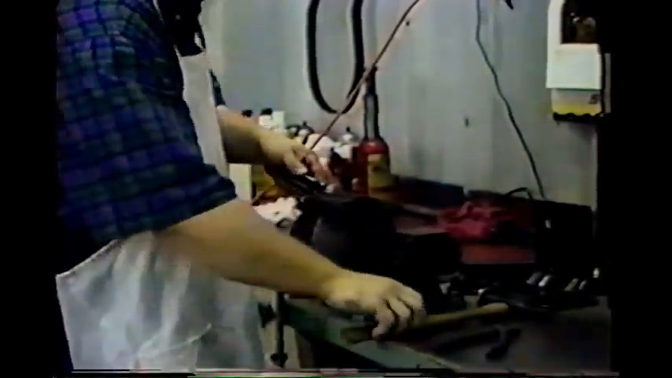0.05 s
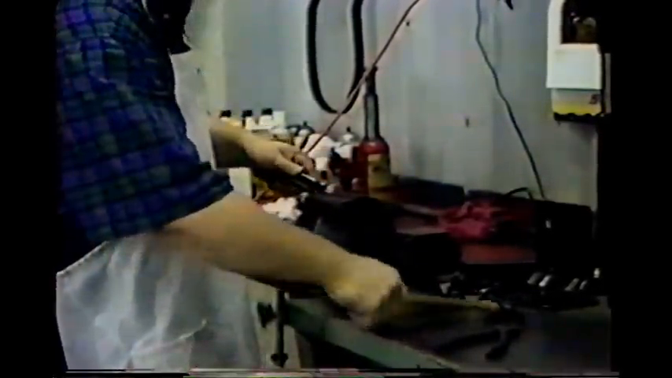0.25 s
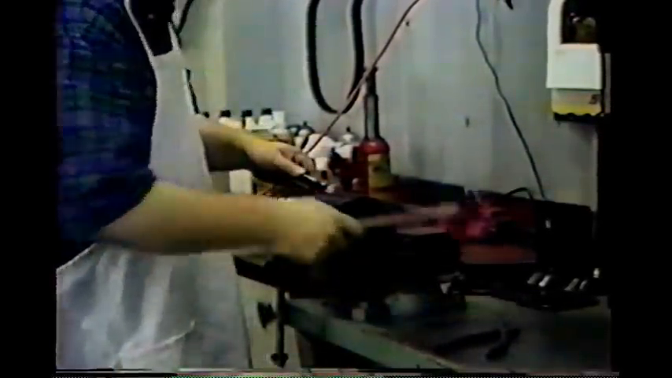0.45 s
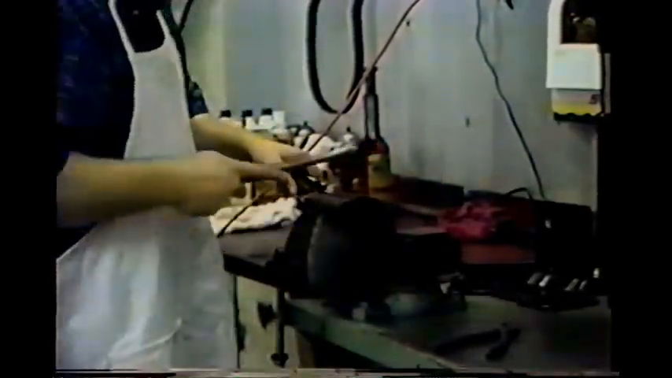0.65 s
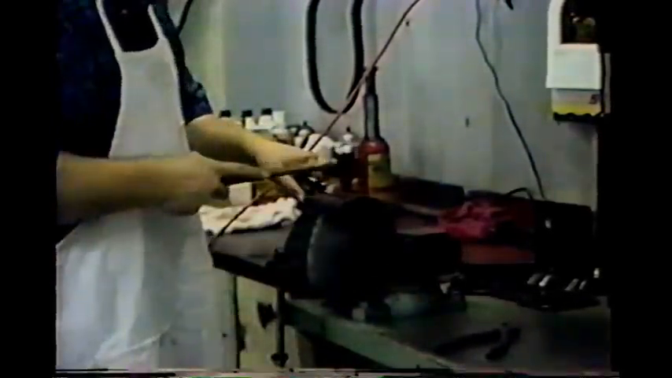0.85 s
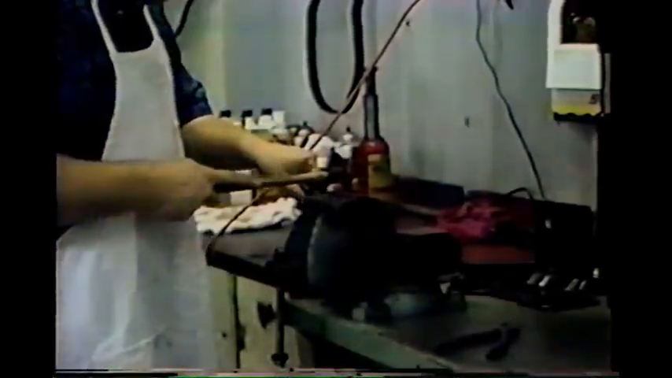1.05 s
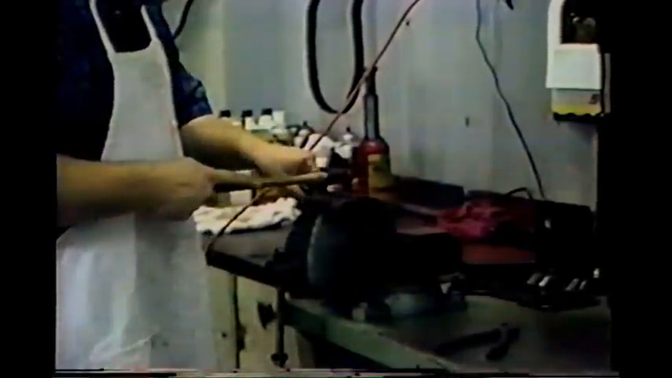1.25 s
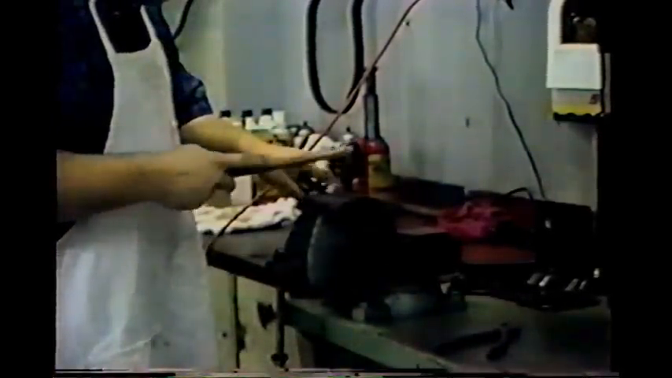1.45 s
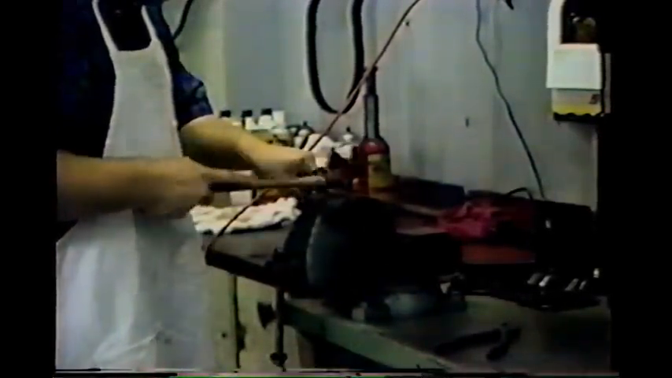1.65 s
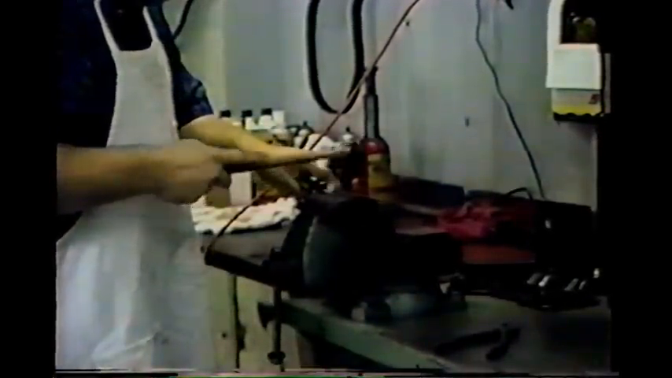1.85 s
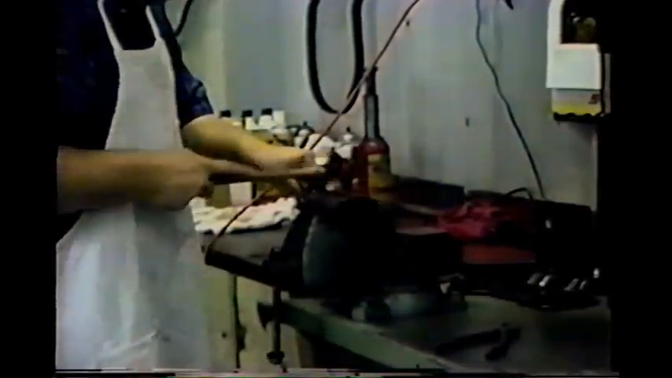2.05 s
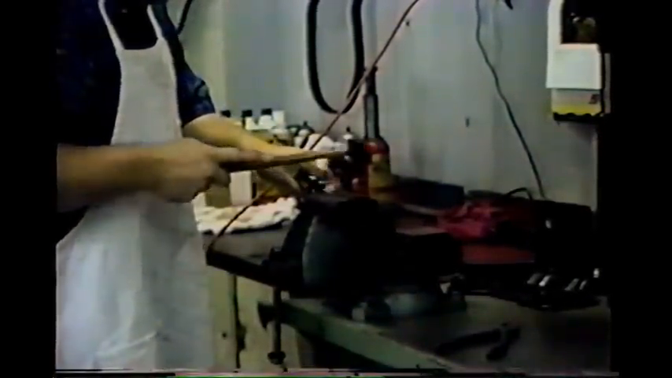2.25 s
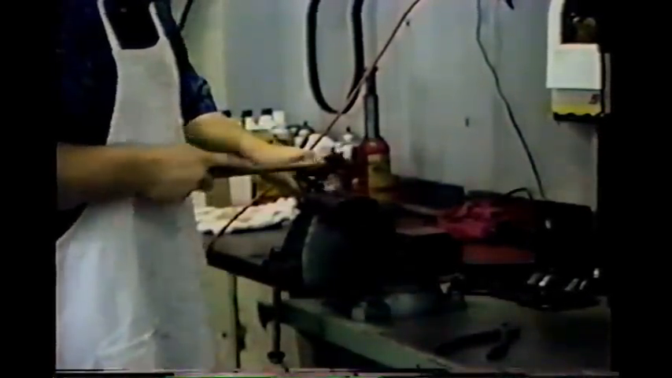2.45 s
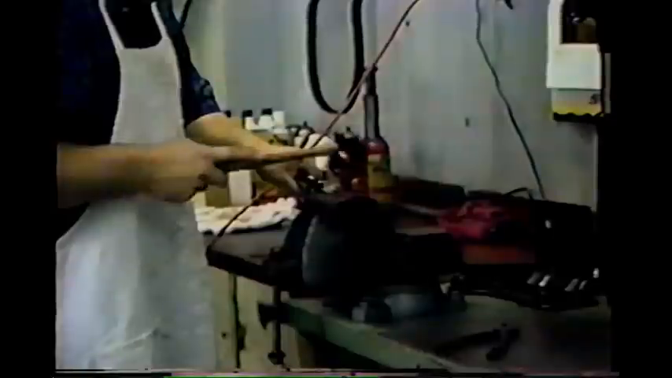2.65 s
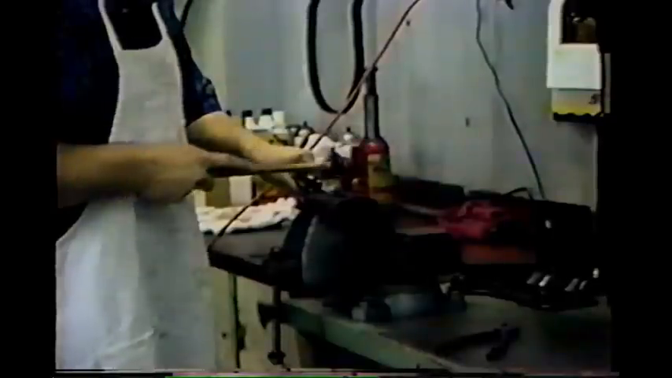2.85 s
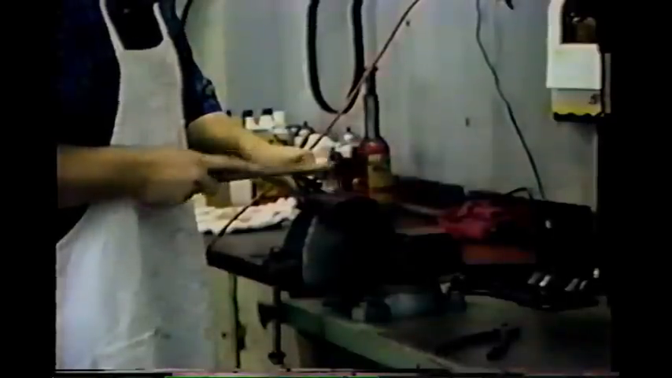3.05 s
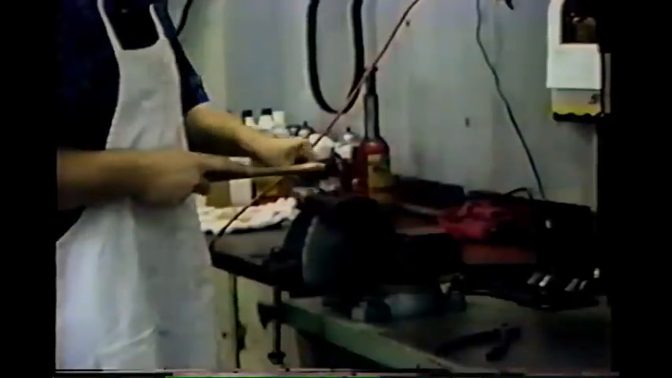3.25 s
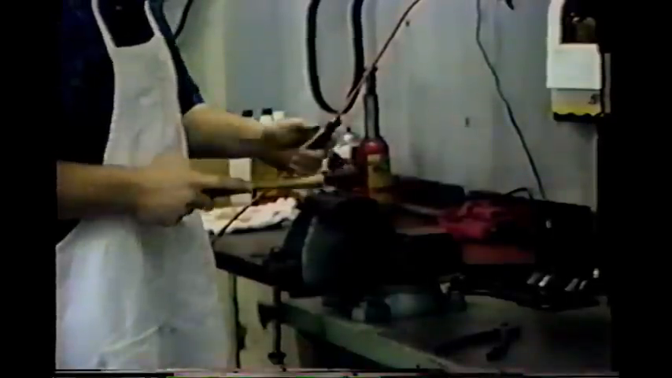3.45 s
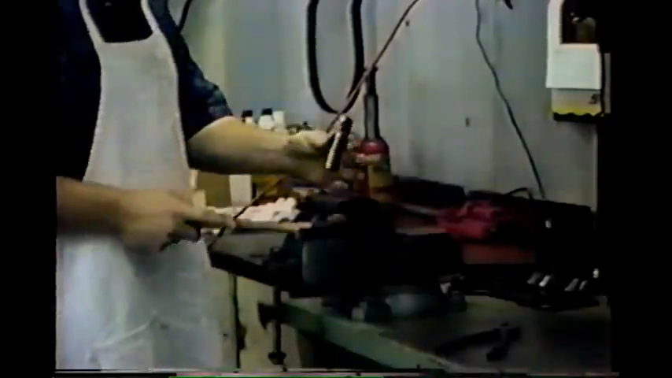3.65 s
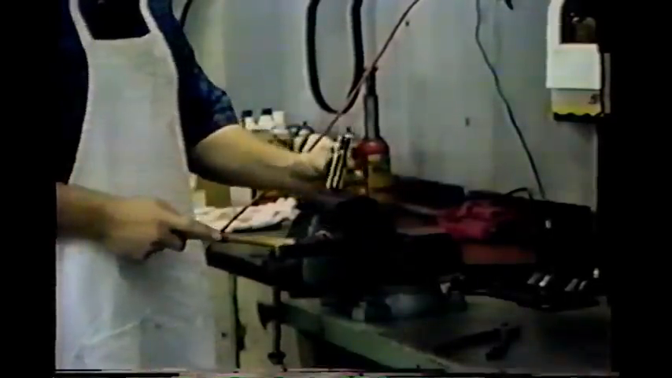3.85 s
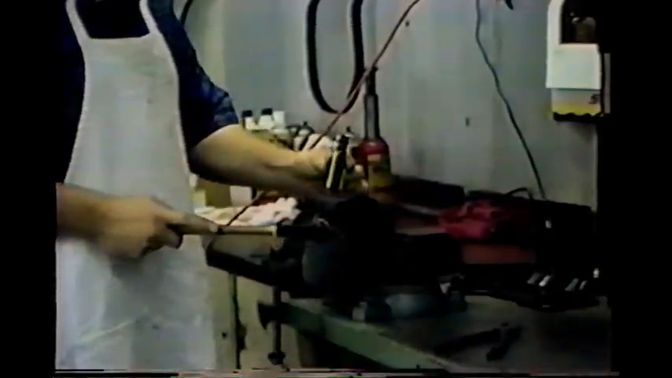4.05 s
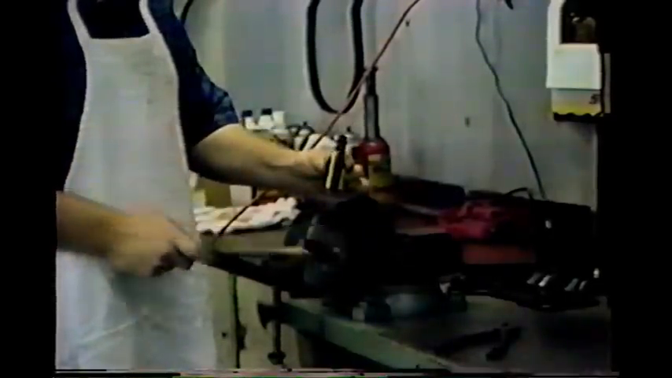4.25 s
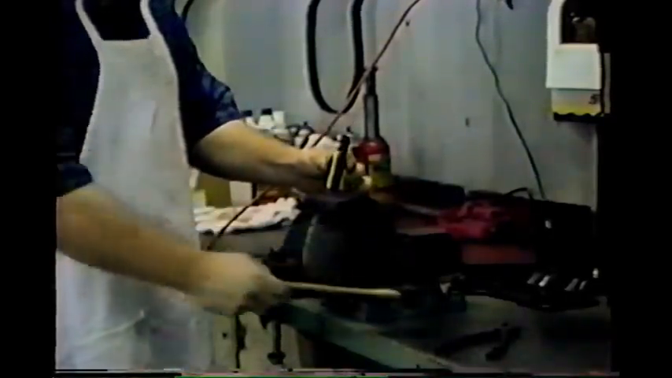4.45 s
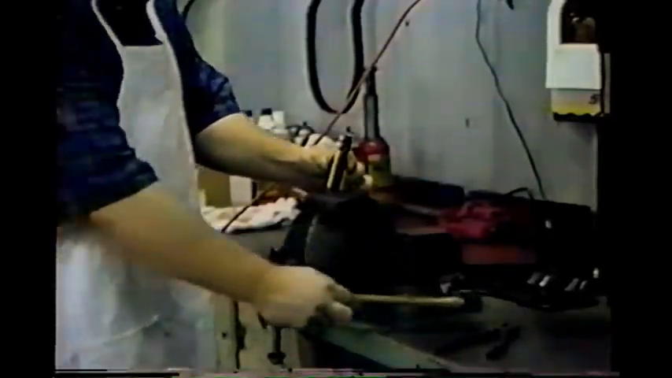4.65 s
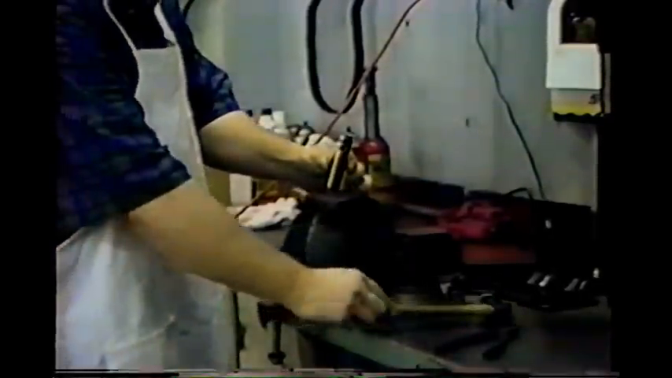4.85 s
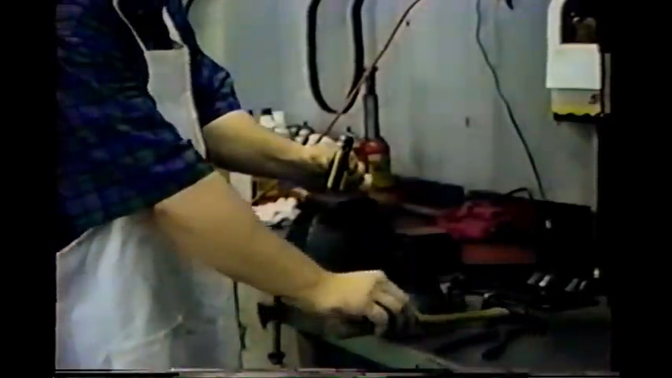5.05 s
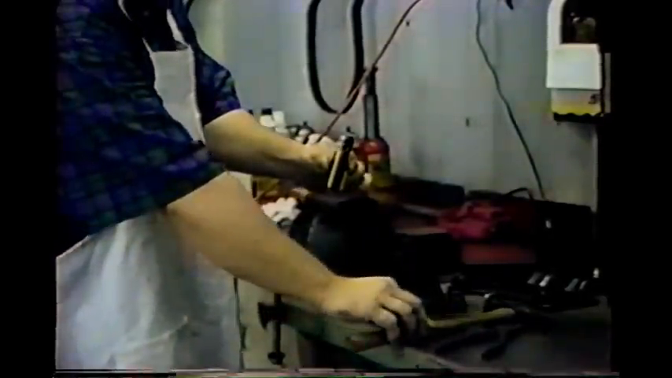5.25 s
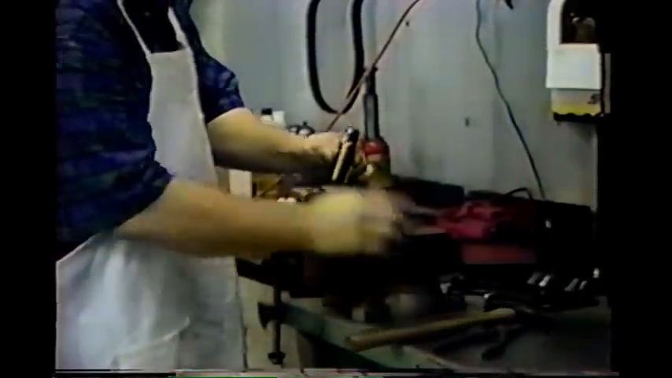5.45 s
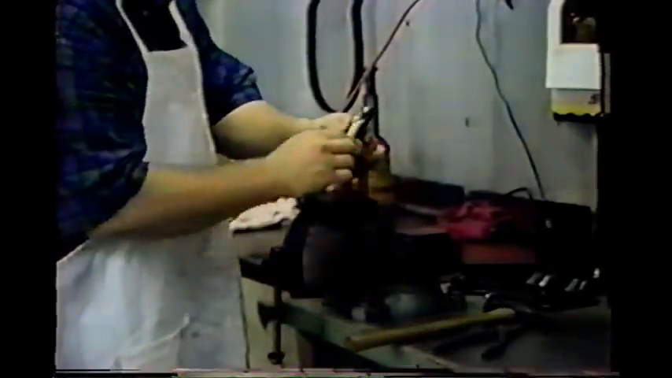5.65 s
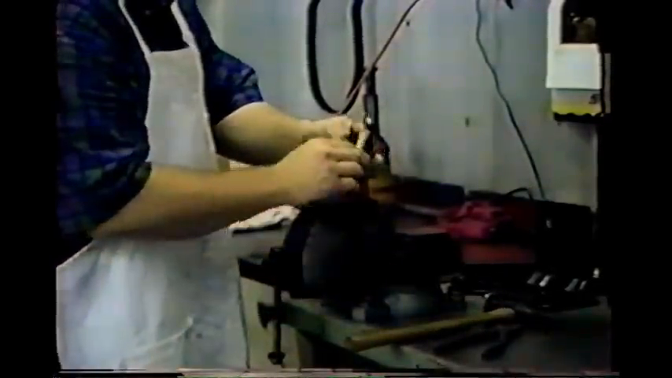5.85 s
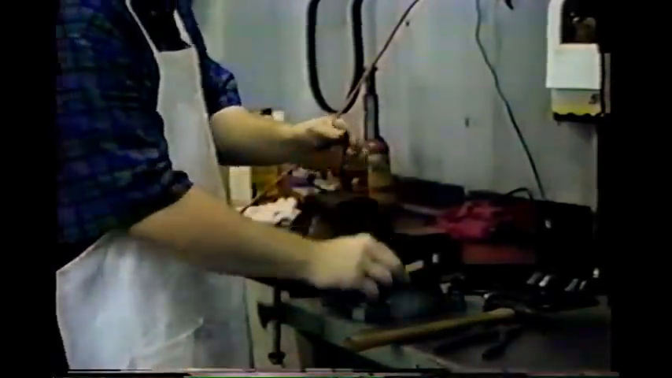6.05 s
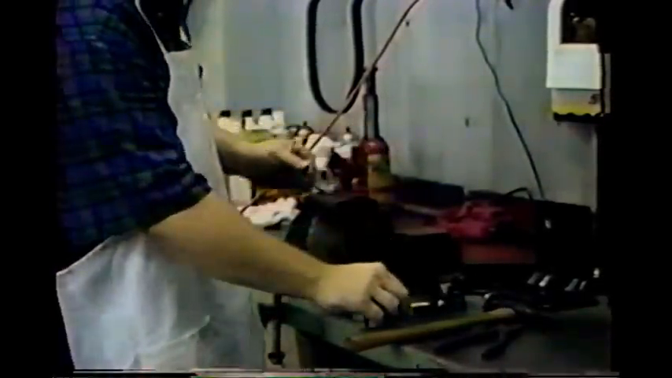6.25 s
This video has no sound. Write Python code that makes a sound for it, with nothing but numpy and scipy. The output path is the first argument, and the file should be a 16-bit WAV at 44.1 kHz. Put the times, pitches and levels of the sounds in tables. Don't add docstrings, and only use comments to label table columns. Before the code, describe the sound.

A mono tape-camera recording in a hard, echoing workshop, with low building rumble, an uneven machine drone, hiss, electrical buzz and a thin very high whine throughout. At 0 to 0.3 seconds a hammer is dragged off a bench in two short gritty rubs with a squeak of steel, the second louder. A light, dull aiming tap lands on a clamped screwdriver at 1.0. The cleanest, brightest blow rings at 1.6, and the rumble drops back as the camera turns itself down. Duller, shorter knocks follow at 2.0, 2.35 and 2.7, the later ones sharper, then a weak double-touch glancing hit at 3.07. Each rattles the bench and leaves echo. A small metal part ticks at 3.8, with a barely audible brush at 4.5. At 4.73 the wooden handle lands, the head clacks on tools at 4.78 and clinks at 4.86, the handle bounces at 4.94 and settles softly at 5.17. Only background remains until about 6.4.

```python
import sys
import numpy as np
from scipy import signal
from scipy.fft import rfft, irfft
from scipy.io import wavfile
from scipy.ndimage import uniform_filter1d

SR = 44100
rng = np.random.default_rng(int(sys.argv[2]) if len(sys.argv) > 2 else 0)


def log_audio(samples):
    frames = np.atleast_2d(samples).T
    limited = np.clip(frames, -1, 1)
    pcm = np.round(limited * 32767).astype(np.int16)
    wavfile.write(sys.argv[1], SR, pcm)


def volts_from_db(level):
    exponent = np.asarray(level, float) / 20
    return 10 ** exponent


N = 278419
T = np.arange(N) / SR
ECHO = 2 ** 16
FIELD_HZ = 59.94

# (time [s], peak [dB], bench thud [dB], steel ring [dB], edge sharpness [dB])
CLEAN = [
    (1.625, -21.5, -1.7, 2, -0.64),
]
# (time [s], peak [dB], bench thud [dB], steel ring [dB], edge sharpness [dB])
BLOWS = [
    (1.995, -23, -2, -12, 0),
    (2.353, -25.5, 2, -9, 7.5),
    (2.714, -25.5, 1.5, -8, 9),
]
# (time [s], peak [dB], bench thud [dB], steel ring [dB], edge sharpness [dB])
GLANCE = [
    (3.0715, -30, -2, 0.091, 12.5),
    (3.080, -31, -2, 0.1, 4.7),
]
# (time [s], peak [dB], bench thud [dB], handle ring [dB], edge sharpness [dB])
BOUNCES = [
    (4.7349, -24, 2.7, -8, -7.5),
    (4.940, -23.5, 1.1, -3.5, 1.5),
]


def evened(x):
    return x / np.sqrt(np.mean(x ** 2) + 1e-20)


def read(points, hz):
    f, value = np.transpose(points)
    return np.interp(np.log(hz + 1), np.log(f + 1), value)


def coloured(x, db_of):
    log_gain = np.maximum(db_of(abs(np.fft.fftfreq(4096, 1 / SR))), -100) * np.log(10) / 20
    minimum_phase = -signal.hilbert(log_gain).imag
    taps = np.fft.ifft(np.exp(log_gain + 1j * minimum_phase)).real[:2048]
    return signal.oaconvolve(x, taps)[:len(x)]


def resonate(x, hz, width):
    turn = np.exp(2j * np.pi * np.cumsum(hz * np.ones(len(x))) / SR)
    r = np.exp(-np.pi * width / SR)
    return 2 * (turn * signal.lfilter([1 - r], [1, -r], x / turn)).real


def shop(rattle_t60, snap_db=0, direct_db=-26):
    # (centre [Hz], build-up [ms], rattle time factor [1], hall time to fall 60 dB [s],
    # hall level [dB], first crack [dB])
    bands = [(154, 14, 0.81, 1.16, -17, -17.5), (400, 21, 1.03, 0.98, -23, -2.5),
             (860, 10, 0.87, 0.64, -23.5, -3), (1770, 2, 0.99, 1.1, -21, -13.5),
             (2910, 5, 1.026, 1.356, -19, 4.5), (5040, 3.9, 0.9, 1.53, -21.5, 8),
             (8050, 2.2, 0.97, 1.06, -16, 8), (12900, 4.3, 0.31, 0.39, -11, -2.5)]
    t = T[:ECHO]
    noise = rfft(rng.standard_normal(ECHO))
    hz = np.fft.rfftfreq(ECHO, 1 / SR)
    centres = np.log([row[0] for row in bands])
    crack = volts_from_db(-60 * t / 0.025) * (1 - np.exp(-t / 0.00029))
    near, hall = 0, 0
    for k, (_, rise_ms, factor, hall_t60, hall_db, crack_db) in enumerate(bands):
        share = np.interp(np.log(hz + 1), centres, np.arange(len(bands)) == k)
        band = irfft(noise * share)
        rise = 1 - np.exp(-1000 * t / rise_ms)
        rattle = volts_from_db(-60 * (t / (0.77 * factor * rattle_t60)) ** 1.2) * rise
        near = near + band * (rattle + volts_from_db(crack_db + snap_db) * crack)
        hall = hall + band * volts_from_db(hall_db - 60 * t / hall_t60) * rise
    size = np.linalg.norm((near + hall)[:SR // 10])
    direct = volts_from_db(direct_db) * (t == 0)
    return near / size + direct, hall / size


def knocks(rows, colour, modes, ring_db, level_db, rattle_t60, snap_db=0, carry_db=0, air_db=0):
    contact_s = .0009
    out, t = np.zeros(N + ECHO), T[:ECHO // 4]
    for s, peak_db, thud_db, steel_db, edge_db in rows:
        shelves = [(500, thud_db), (2000, 0.0153), (5000, 0.0045), (9000, edge_db)]
        click = coloured(1. * (t == 0), lambda hz: read(colour, hz) + read(shelves, hz))
        click = click / np.linalg.norm(click)
        ring = 0
        for hz, db, t60 in modes:
            ring = ring + volts_from_db(db - 60 * t / t60) * np.sin(2 * np.pi * hz * t) / np.sqrt(t60)
        ring = volts_from_db(ring_db + steel_db) * ring / np.linalg.norm(ring)
        near, hall = shop(max(rattle_t60, .05), snap_db)
        sound = signal.fftconvolve(click + volts_from_db(-0.5 - carry_db) * ring, near)
        sound += signal.fftconvolve(click + volts_from_db(-0.5 + carry_db) * ring, hall)
        sound[:len(t)] += volts_from_db(air_db - 6.0) * ring
        sound[:len(t)] *= (1 - np.exp(-t / contact_s)) ** 2
        out[round(s * SR):][:ECHO] += volts_from_db(peak_db + level_db) * sound[:ECHO]
    return out[:N]


def screwdriver_blows():
    # (frequency [Hz], level [dB per Hz])
    blow_colour = [(59, -32.5), (100, -7.5), (322, 1), (547, -3), (910, 1), (1010, -2), (1150, 0),
                   (2420, -5.5), (4770, -6.5), (13500, -44), (16000, -26)]
    # (frequency [Hz], level [dB], time to fall 60 dB [s])
    shank_free = [(1170, -17, .4), (1670, -11, .02), (2540, -13, .02), (3350, -12, .02), (4280, -11, .02),
                  (4660, -6, .035), (4800, 2, .12), (4915, -2, .07), (4900, -1, .016), (5060, -4, .035),
                  (6300, -20, .02)]
    # (frequency [Hz], level [dB], time to fall 60 dB [s])
    shank = [(1128, -16, .3), (1460, 0, .025), (2850, -19, 0.026), (3400, -8.5, .02), (4250, -9, .03),
             (4780, 10, 0.036), (4730, -17, .03), (4930, 21, 0.01), (6404, -28, .03)]
    # (frequency [Hz], level [dB], time to fall 60 dB [s])
    shank_loose = [(1300, -1.5, .012), (2300, -4, .012), (2700, 0.1, .012), (3650, -5, .008),
                   (4820, -2.5, .012), (5600, -8, .01), (7500, -14, .01)]
    blows = knocks(BLOWS, blow_colour, shank, ring_db=-8, level_db=28, rattle_t60=0.24)
    blows += knocks(CLEAN, blow_colour, shank_free, ring_db=-3, level_db=29.5, rattle_t60=0.28,
                    snap_db=2.5, carry_db=3.0, air_db=7.5)
    blows += knocks(GLANCE, blow_colour, shank_loose, ring_db=-4.0, level_db=26.0, rattle_t60=0.16, snap_db=4)
    return blows


def aiming_tap():
    # (time [s], peak [dB], bench thud [dB], steel ring [dB], edge sharpness [dB])
    tap = [
        (0.9937, -28, 2.5, -2.5, -8),
    ]
    # (frequency [Hz], level [dB per Hz])
    tap_colour = [(120, -38), (200, -14), (647, -15), (696, -6), (899, -4.5), (1100, -5.5), (2420, -24.5),
                  (4860, -11), (6400, -27.5), (16000, -53)]
    # (frequency [Hz], level [dB], time to fall 60 dB [s])
    shank_held = [(726, -2, 0.028), (1060, -1, 0.014), (1200, -11, 0.0156), (1865, -5, 0.027),
                  (3970, -15, 0.018), (4410, -16, .015), (4900, -5, 0.0201), (6130, -10, .012)]
    return knocks(tap, tap_colour, shank_held, ring_db=-3.5, level_db=25.5, rattle_t60=0.26,
                  snap_db=10.5, carry_db=6.0, air_db=3)


def dropped_hammer():
    # (frequency [Hz], level [dB per Hz])
    bounce_colour = [(59, -34), (100, -19.5), (373, -5.5), (836, -3), (1060, -2), (1680, -6), (6150, -12),
                     (9210, -30), (12100, -29.5), (14400, -44.5), (16000, -38)]
    # (frequency [Hz], level [dB], time to fall 60 dB [s])
    handle = [(590, -20, .04), (1120, 2, 0.086), (1340, -11.5, .04), (1780, 5, 0.05), (2600, 6, 0.0098),
              (3800, -15, .02)]
    # (time [s], peak [dB], bench thud [dB], steel ring [dB], edge sharpness [dB])
    clacks = [
        (4.783, -24, -1, 2.8, 1),
    ]
    # (frequency [Hz], level [dB per Hz])
    clack_colour = [(120, -64), (200, -8), (558, 5.5), (836, -8), (1100, 4), (1250, -11), (1400, -0.5),
                    (2610, -14), (4270, 1.5), (16000, -45)]
    # (time [s], peak [dB], bench thud [dB], steel ring [dB], edge sharpness [dB])
    clink = [
        (4.8645, -30.5, 4, -5, -1),
    ]
    # (frequency [Hz], level [dB per Hz])
    clink_colour = [(880, -3.5), (1500, -3), (2460, -12), (2730, -5), (3290, -1), (4190, -16), (4690, -2),
                    (14000, -41)]
    # (frequency [Hz], level [dB], time to fall 60 dB [s])
    head = [(4150, -8, 0.0085), (4360, 2.3, .03), (4820, 4, .02), (5530, -10, .012), (6670, -4, .015),
            (8000, -27.5, .015)]
    # (time [s], peak [dB], bench thud [dB], bench ring [dB], edge sharpness [dB])
    settle = [
        (5.167, -33.5, 0.12, -0.1, 0.091),
    ]
    # (frequency [Hz], level [dB per Hz])
    settle_colour = [(120, -34), (200, -25), (387, 0.5), (448, -14), (579, -8), (821, -11), (1140, -3.5),
                     (1480, -13), (4600, -19), (16000, -56)]
    # (frequency [Hz], level [dB], time to fall 60 dB [s])
    bench = [(375, 0, 0.06), (583, 0, 0.045), (970, 1.5, 0.04), (1990, -2, 0.022), (2220, -1, 0.02),
             (4260, -10, .02)]
    sound = knocks(BOUNCES, bounce_colour, handle, ring_db=-13.0, level_db=27.5, rattle_t60=0.17, carry_db=-7)
    sound += knocks(clacks, clack_colour, head, ring_db=-17.0, level_db=25, rattle_t60=0.27, snap_db=7, air_db=7)
    sound += knocks(clink, clink_colour, head, ring_db=-12, level_db=21.5, rattle_t60=0.24, snap_db=4.5, air_db=3)
    sound += knocks(settle, settle_colour, bench, ring_db=-3.0, level_db=23.5, rattle_t60=0.18)
    return sound


def drag():
    # (start [s], end [s], level [dB], steel squeak [dB], first squeak pitch [Hz])
    strokes = [
        (0, 0.084, -45.5, -8, 5400),
        (0.167, 0.225, -38.5, -4, 5580),
    ]
    # (frequency [Hz], level [dB per Hz])
    grit_colour = [(88, -24), (150, 1), (231, 3.5), (257, -16), (355, 3), (598, 5.5), (1340, 6),
                   (2960, -4.5), (5560, -11), (11000, -31.5), (14300, -44), (22000, -120)]
    # (share of squeak pitch [1], width [Hz], level [dB])
    squeak_tones = [(.14, 90, -18), (.75, 400, -12), (1, 300, 13), (1.34, 300, -9)]
    grip_s, lift_s, fade_s = 0.043, 0.076, 0.16
    grip_db, start_db, lift_db, fade_db = -18.5, -4, -20, -31
    squeak_loss_db, bright_start_db, bright_end_db, settled_hz = 15, 5, -4, 5300

    t = T[:round(.45 * SR)]
    sizes = volts_from_db(1.16 * np.minimum(rng.exponential(1, len(t)), 4))
    happens = rng.random(len(t)) < 3000 / SR
    slips = sizes * happens * rng.choice([-1, 1], len(t))
    rub = evened(coloured(slips, lambda hz: read(grit_colour, hz)))
    treble = signal.lfilter(*signal.butter(2, 3000, "high", fs=SR), rub)
    dry = 0
    for start, end, level_db, squeak_db, pitch_hz in strokes:
        u = np.clip((t - start) / (end - start), 0, 1)
        bright_db = bright_start_db + (bright_end_db - bright_start_db) * u
        grit = rub + (volts_from_db(bright_db) - 1) * treble
        hz = pitch_hz + (settled_hz - pitch_hz) * u
        squeak = evened(sum(volts_from_db(db) * evened(resonate(rub, share * hz, w)) for share, w, db in squeak_tones))
        shape_db = np.interp(t, [start - 2 * grip_s, start - grip_s, start, end, end + lift_s, end + fade_s],
                             [2 * grip_db + lift_db, grip_db, start_db, 0, lift_db, fade_db])
        steel = volts_from_db(squeak_db - squeak_loss_db * u ** 2) * squeak
        dry = dry + volts_from_db(level_db + shape_db) * (grit + steel)
    sound = np.zeros(N)
    sound[:ECHO] = signal.fftconvolve(dry, sum(shop(0.074, direct_db=1.0)))[:ECHO]
    return volts_from_db(-6.0) * sound


def small_parts():
    # (time [s], peak [dB], bench thud [dB], part ring [dB], edge sharpness [dB])
    ticks = [
        (3.8344, -47.5, 20, -0.14, 1),
    ]
    # (frequency [Hz], level [dB per Hz])
    tick_colour = [(500, -32), (1100, -14), (1600, 0), (2400, -6), (3500, -16), (5000, -20), (9000, -38)]
    # (time [s], peak [dB], bench thud [dB], part ring [dB], edge sharpness [dB])
    brush = [
        (4.524, -58, -12, -9, -3),
    ]
    # (frequency [Hz], level [dB per Hz])
    brush_colour = [(600, -30), (1500, -8), (2500, -1), (4000, -14), (8000, -25)]
    # (frequency [Hz], level [dB], time to fall 60 dB [s])
    part = [(1450, -4, .04), (1700, 0, .06), (1730, -3, .16), (2300, -9, .025), (2700, -13, .03),
            (3150, -17, .04)]
    sound = knocks(ticks, tick_colour, part, ring_db=5.0, level_db=17.0, rattle_t60=0.13, snap_db=-5.5, air_db=3)
    sound += knocks(brush, brush_colour, part, ring_db=-6, level_db=14.5, rattle_t60=.12)
    return sound


def slow_gain_db():
    lasting_db, dip_db, recover_db_per_s, close_s = 10.5, 9, 15, 0.27
    hard = np.sort([row[0] for row in CLEAN + BLOWS + GLANCE + BOUNCES])
    last = np.searchsorted(hard, T) - 1
    dip = np.maximum(dip_db - recover_db_per_s * (T - hard[last]), 0)
    cut_db = (last >= 0) * (lasting_db + dip)
    step = 1 / (close_s * SR)
    return -signal.lfilter([step], [1, step - 1], cut_db)


def rumble():
    # (frequency [Hz], level [dB per Hz])
    wash_colour = [(12, -41.5), (20, -13), (43, -20.5), (86, 0.5), (167, 0.5), (501, -13), (555, -18.5),
                   (681, -12), (774, -16.5), (2210, -19.5), (2380, -22.5), (7720, -35), (9000, -43),
                   (11700, -68), (19800, -120)]
    hum_hz, hum_width, hum_db = 74, 12, -10
    frames, hz = N // 256 + 5, np.fft.rfftfreq(1024, 1 / SR)
    a, b, patches = rng.standard_normal((frames, 513, 3)).T
    patches = evened(uniform_filter1d(uniform_filter1d(patches, 4, 0), 14, 1))
    z = (a + 1j * b) * volts_from_db(read(wash_colour, hz)[:, None] + 2.5 * patches)
    wash = evened(signal.istft(z, nperseg=1024, noverlap=768)[1][:N])
    hum = evened(resonate(resonate(rng.standard_normal(N), hum_hz, hum_width), hum_hz, hum_width))
    return volts_from_db(-57.5 + slow_gain_db()) * (wash + volts_from_db(hum_db) * hum)


def electronics():
    # (frequency [Hz], level [dB per Hz])
    hiss_colour = [(12, -28), (20, 7.5), (123, 3.5), (434, -19.5), (542, -9), (738, -22.5), (1120, -15),
                   (7110, -17), (7730, -16.5), (13500, -19), (16000, -19)]
    # (multiple of field rate [1], level [dB rms])
    buzz_tones = [(1, -83), (2, -82), (3, -79), (4, -83), (5, -87), (6, -83), (7, -91), (8, -86), (9, -84),
                  (10, -93), (11, -84), (13, -94), (14, -94), (15, -93), (17, -91), (18, -94), (19, -91),
                  (21, -91), (23, -93), (25, -93)]
    hiss_db, same = -72, .85
    scan_hz, scan_db = 15734, -71
    drift_db, drift_s, drift_top_s, waver_db = 4, 3.1, 0.254, 1.8

    noises = rng.standard_normal((N, 3)).T
    common, left, right = (evened(coloured(n, lambda hz: read(hiss_colour, hz))) for n in noises)
    hiss = volts_from_db(hiss_db) * (np.sqrt(same) * common + np.sqrt(1 - same) * np.array([left, right]))
    buzz = sum(volts_from_db(db) * np.sin(2 * np.pi * (k * FIELD_HZ * T + rng.random())) for k, db in buzz_tones)
    flutter = rng.standard_normal(N)
    skirt = 1.5 * evened(resonate(flutter, scan_hz, 60))
    skirt += 0.32 * evened(resonate(resonate(flutter, 15550, 500), 15550, 500))
    whine = evened(np.sqrt(2) * 0.52 * np.sin(2 * np.pi * scan_hz * T) + skirt)
    rates = np.geomspace(1.5, 14, 16)
    waver = evened(sum(np.sin(2 * np.pi * (f * T + rng.random())) / np.sqrt(f) for f in rates))
    drift = np.cos(2 * np.pi * (T - drift_top_s) / drift_s)
    whine = volts_from_db(scan_db + drift_db * drift + waver_db * waver) * whine
    return hiss + np.sqrt(2) * volts_from_db(-0.3) * buzz + whine


def playback_faults(x):
    # (multiple of frame rate [1], level [dB])
    pulse_tones = [(1, 2.1), (2, 1.5), (3, -0.5), (4, -23)]
    frame_s, whistle_hz, whistle_db = 1.688, 8000, -85
    loudness = np.sqrt(signal.lfilter([1 / 3000], [1, 1 / 3000 - 1], x ** 2))
    pulse = sum(volts_from_db(db) * np.cos(np.pi * k * FIELD_HZ * (T - frame_s)) for k, db in pulse_tones)
    switch = volts_from_db(-47.5) * loudness ** 0.5 * pulse
    smear = evened(resonate(rng.standard_normal(N), whistle_hz, 60))
    tone = np.sin(2 * np.pi * whistle_hz * T) + 0.45 * smear
    whistle = volts_from_db(whistle_db + 3) * tone / (1 + (loudness / volts_from_db(-49)) ** 2)
    thump = signal.sosfilt(signal.butter(1, [30, 400], "band", fs=SR, output="sos"), abs(x))
    return switch + whistle - np.array([[.01], [.25]]) * thump


def scene():
    hammer = drag() + aiming_tap() + screwdriver_blows() + dropped_hammer()
    return np.tile(hammer + small_parts() + rumble(), (2, 1))


def top_cut(x):
    return signal.sosfilt(signal.butter(12, 16640, fs=SR, output="sos"), x)


def record(dry):
    balance_db, ceiling = 2.25, .1
    power_db = 10 * np.log10(abs(uniform_filter1d(dry[0] ** 2, 100)) + 1e-12)
    fall = T * 127.0
    over_db = np.maximum(np.maximum.accumulate(power_db + fall) - fall + 41.5, 0)
    held = dry / volts_from_db(0.29 * uniform_filter1d(over_db, 60))
    held = ceiling * np.tanh(held / ceiling)
    edge = signal.firwin(1501, 15790, window=("kaiser", 9), fs=SR)
    steady = signal.oaconvolve(electronics(), edge[None], "same", axes=1)
    knock_edge = signal.firwin(401, 15750, window=("kaiser", 7), fs=SR)
    held = signal.oaconvolve(held, knock_edge[None], "same", axes=1)
    balance = volts_from_db(np.array([[balance_db / 2], [-balance_db / 2]]))
    return top_cut((held + steady) * balance + playback_faults(held[0]))


dry = scene()
out = record(dry)
log_audio(out)
```